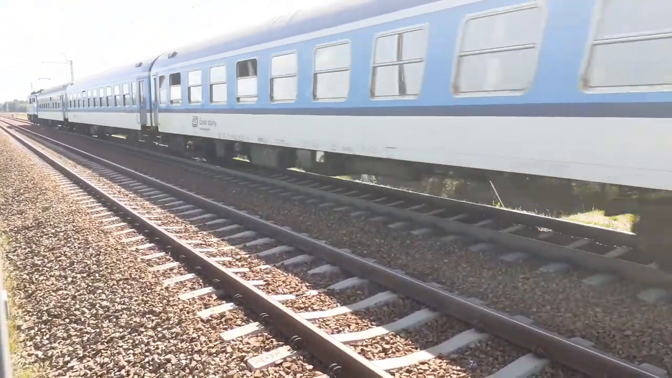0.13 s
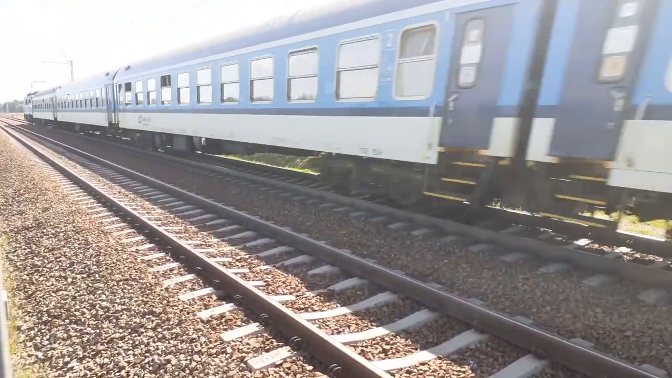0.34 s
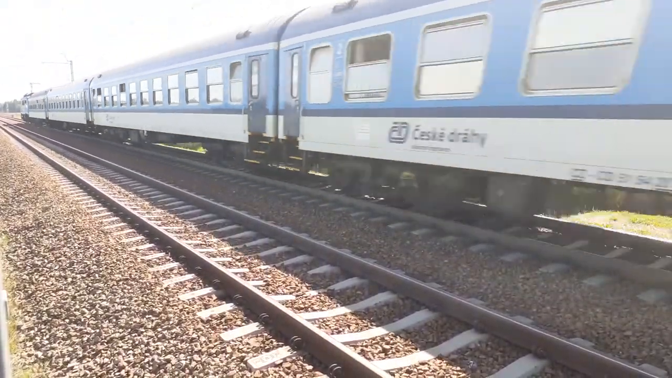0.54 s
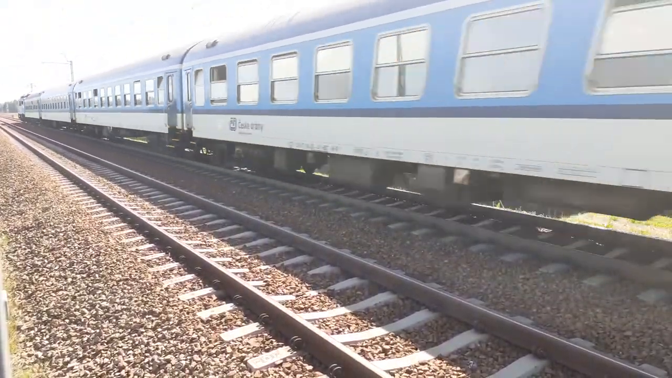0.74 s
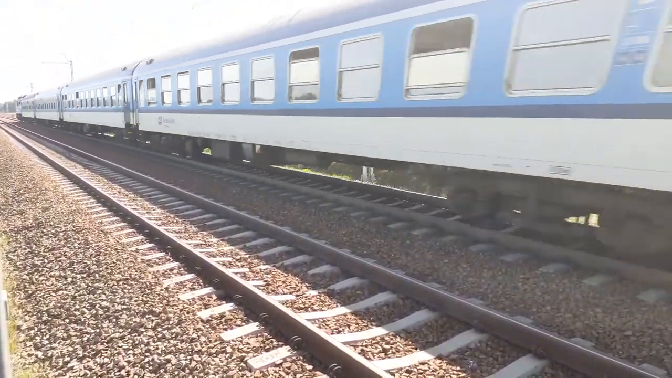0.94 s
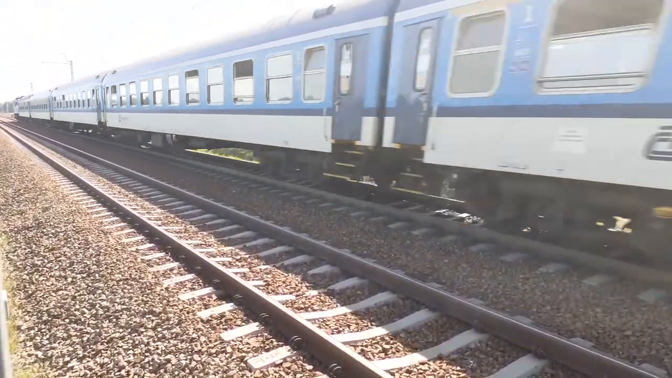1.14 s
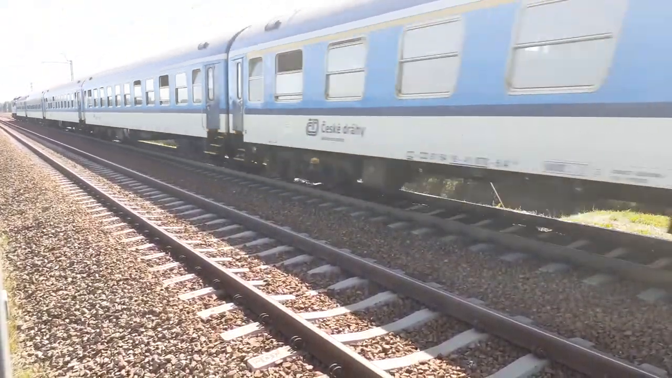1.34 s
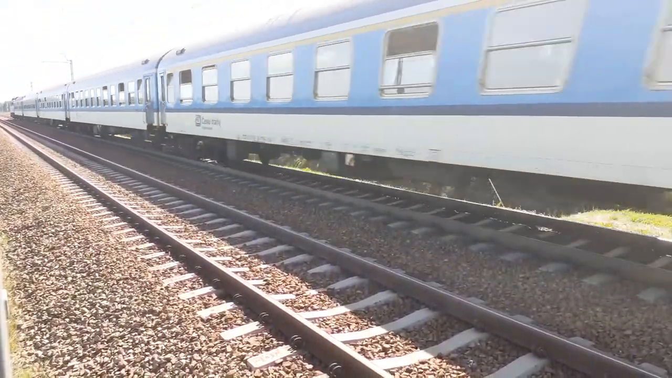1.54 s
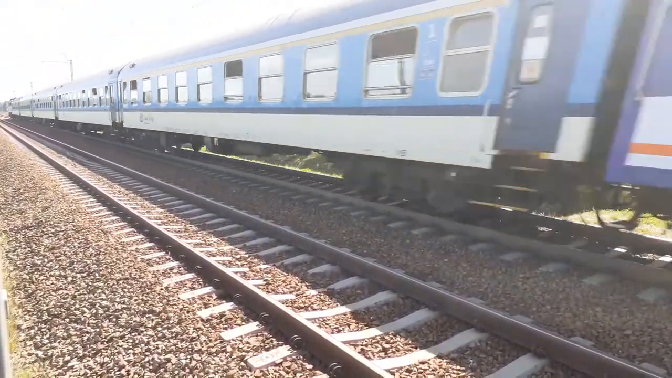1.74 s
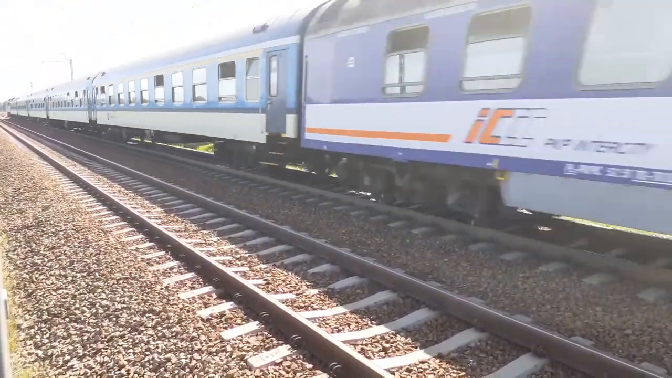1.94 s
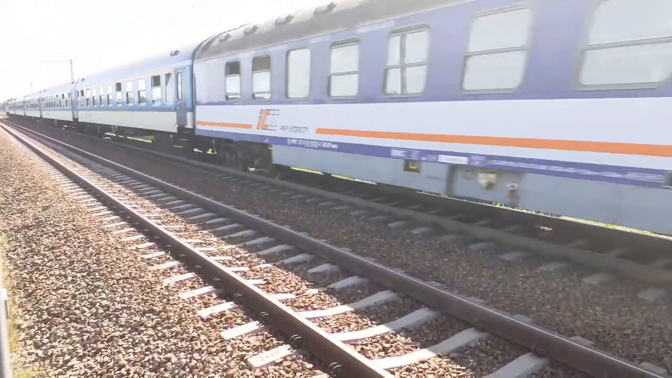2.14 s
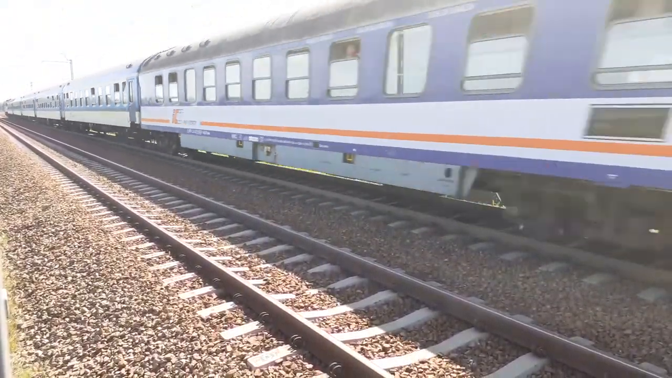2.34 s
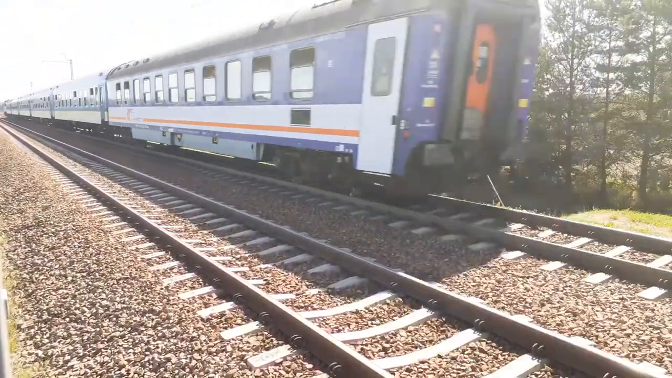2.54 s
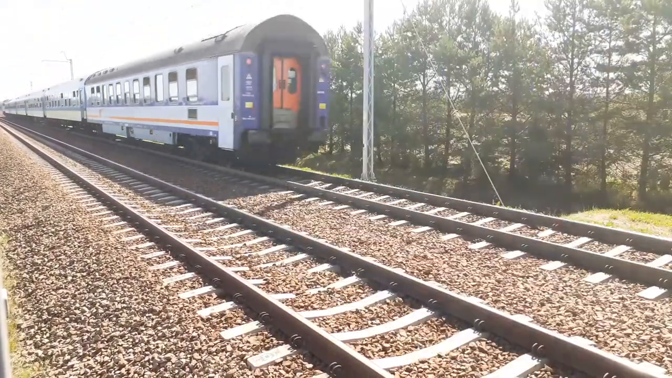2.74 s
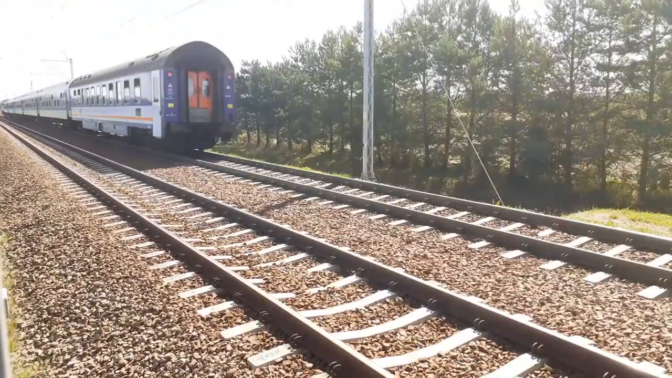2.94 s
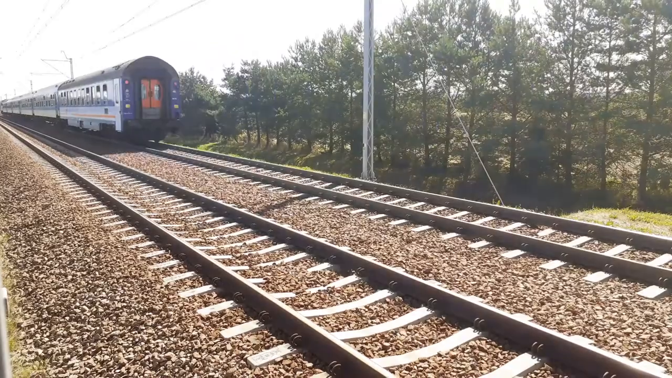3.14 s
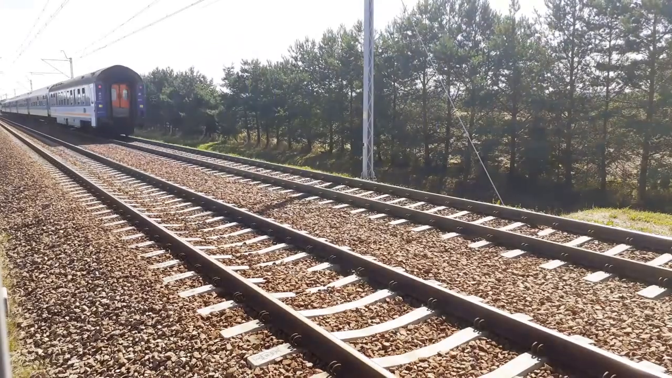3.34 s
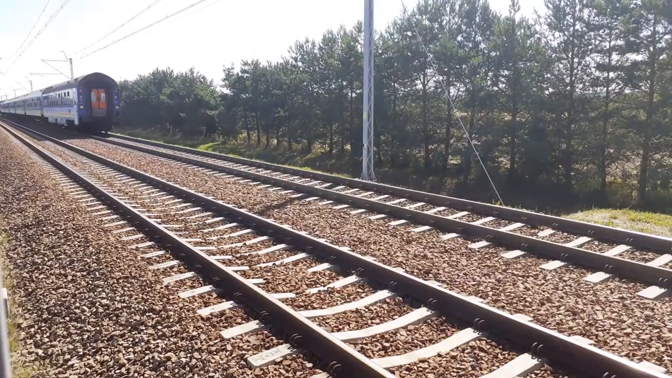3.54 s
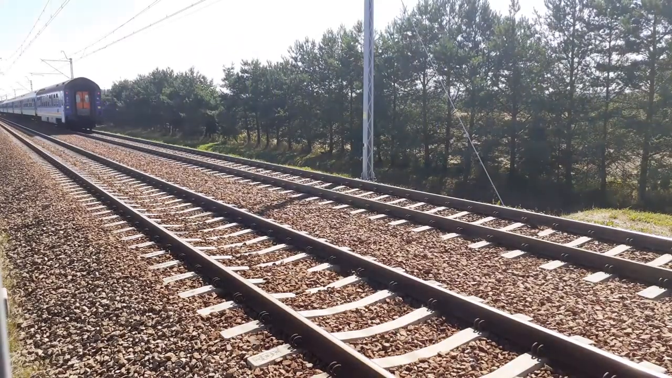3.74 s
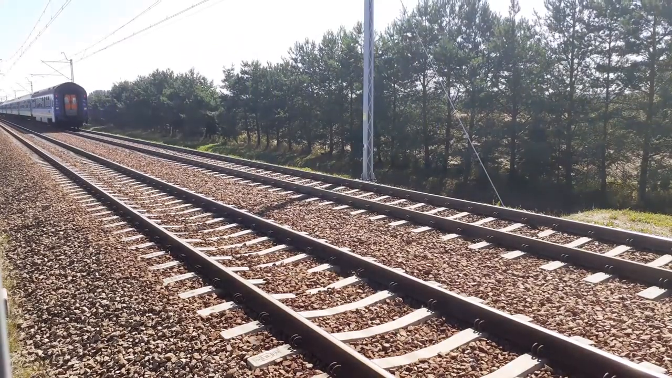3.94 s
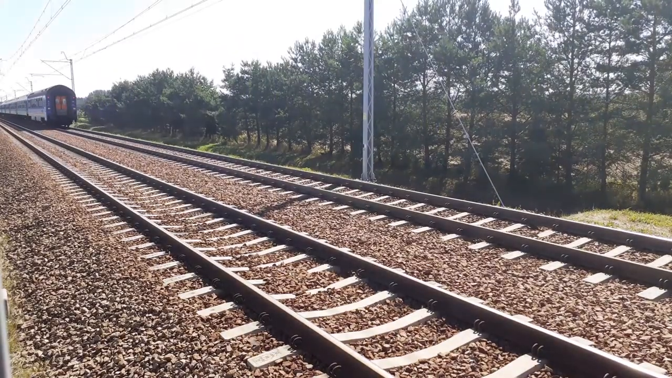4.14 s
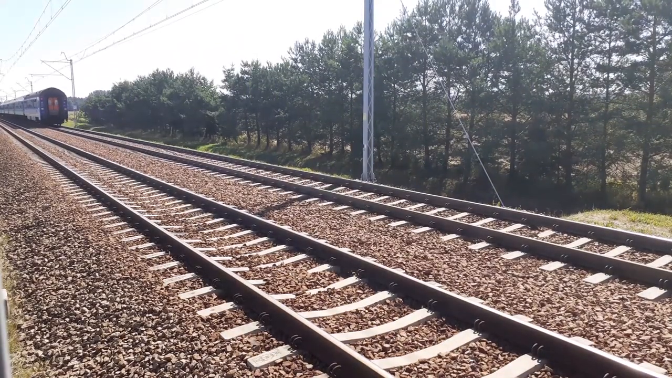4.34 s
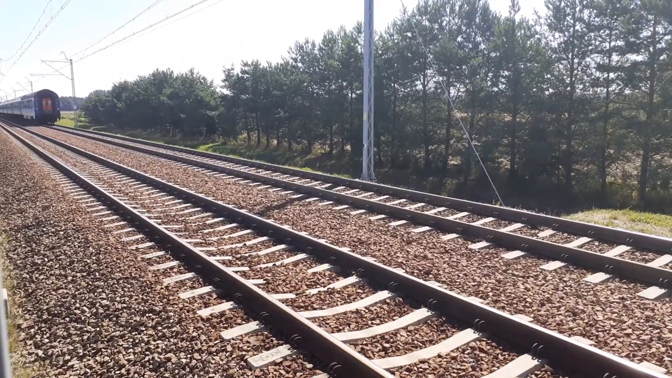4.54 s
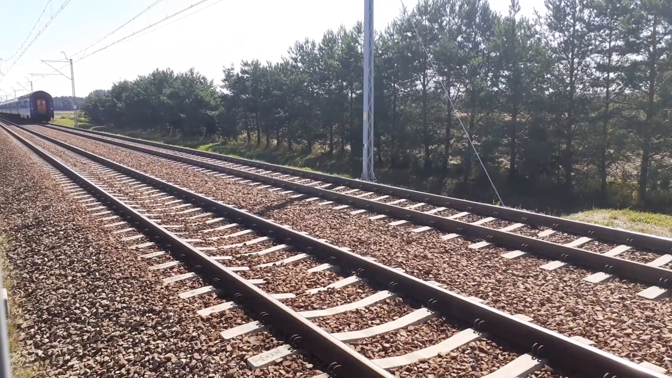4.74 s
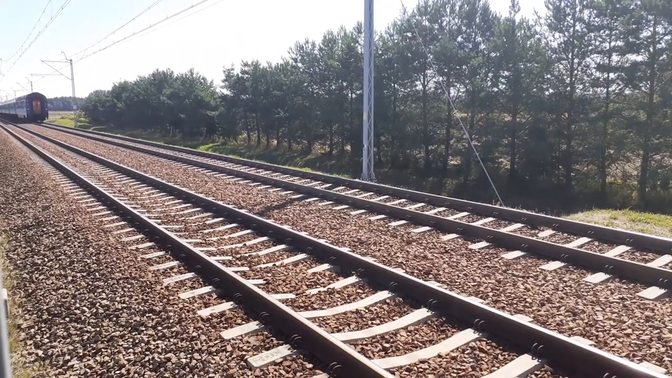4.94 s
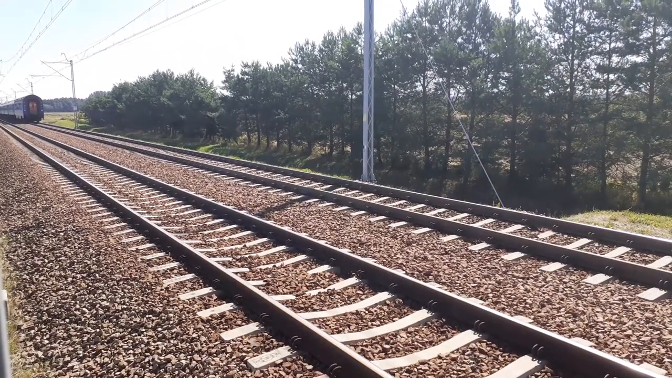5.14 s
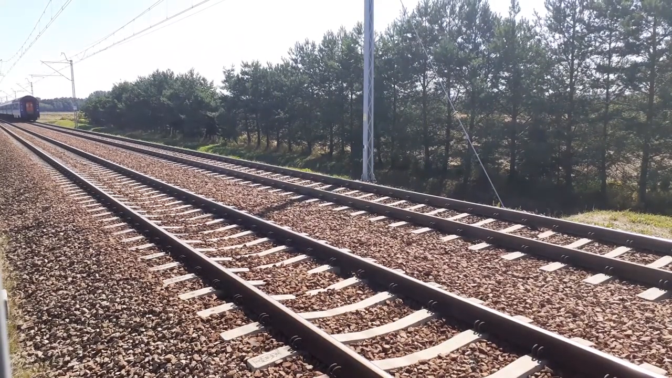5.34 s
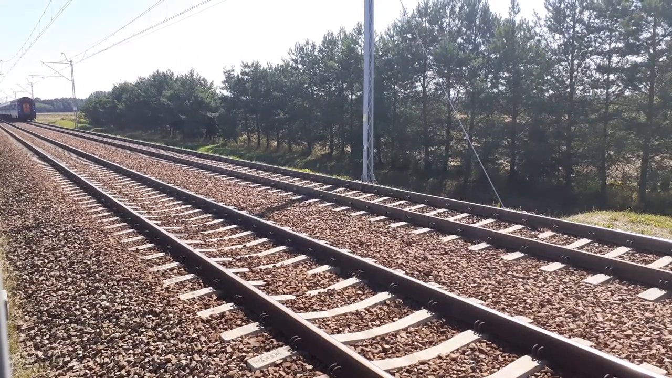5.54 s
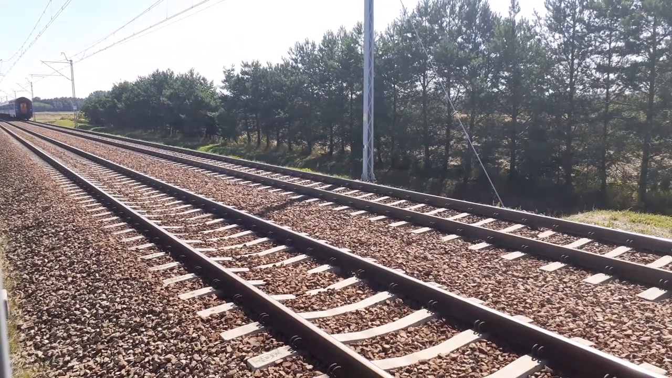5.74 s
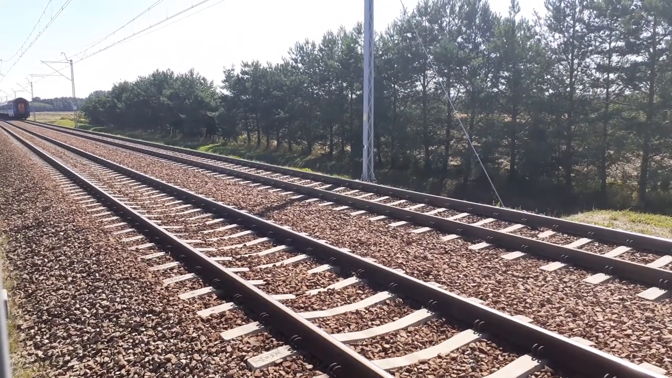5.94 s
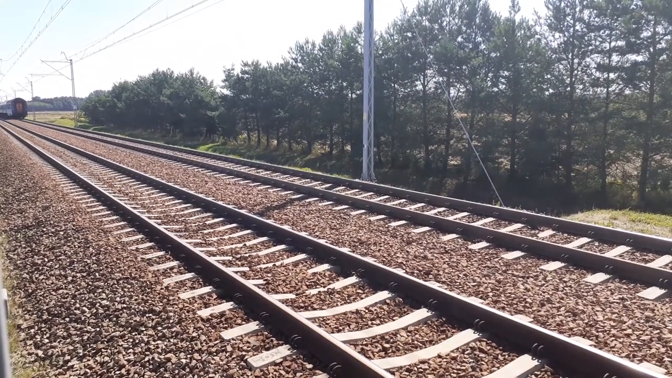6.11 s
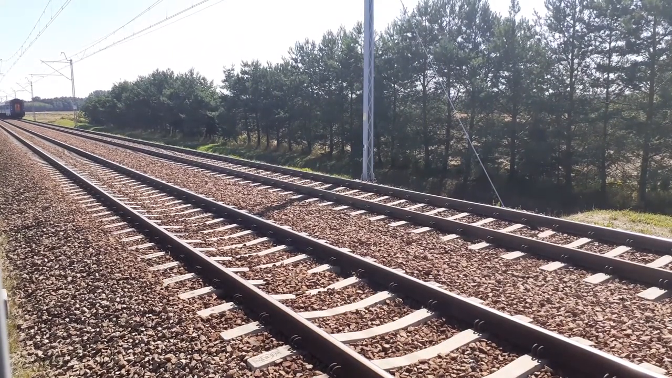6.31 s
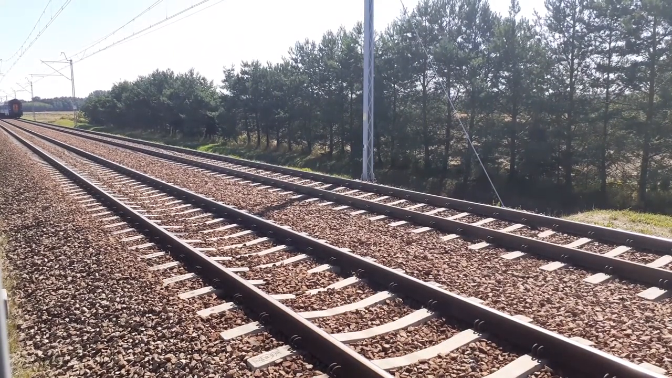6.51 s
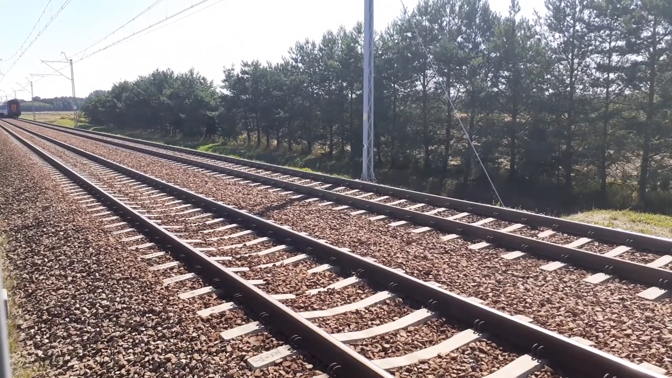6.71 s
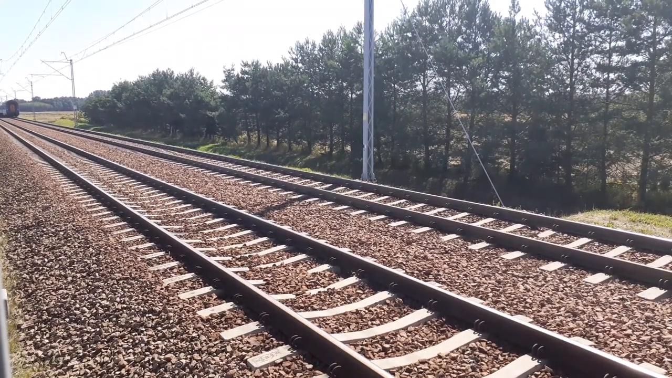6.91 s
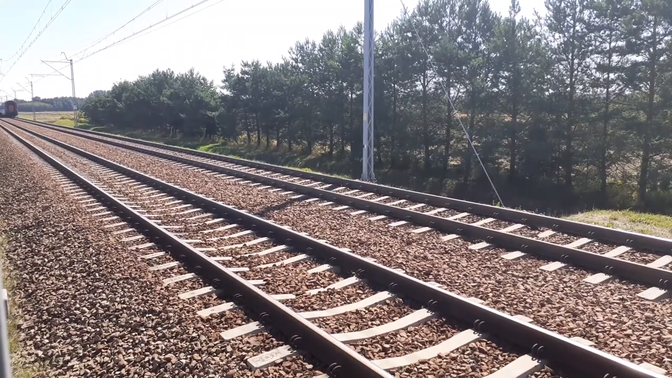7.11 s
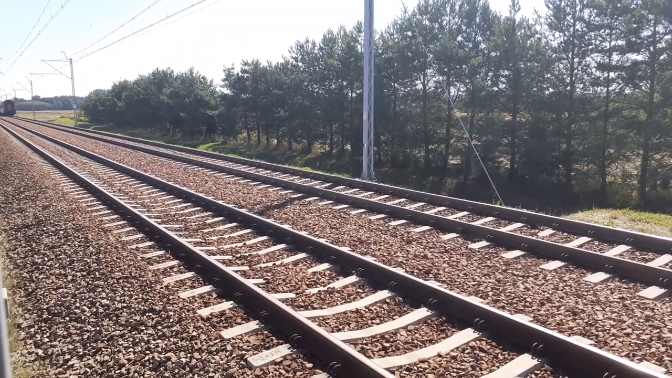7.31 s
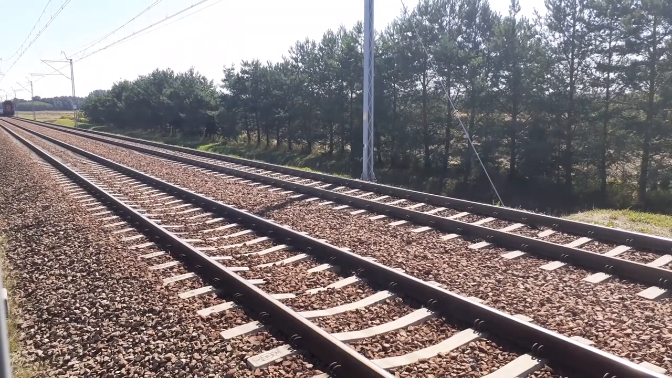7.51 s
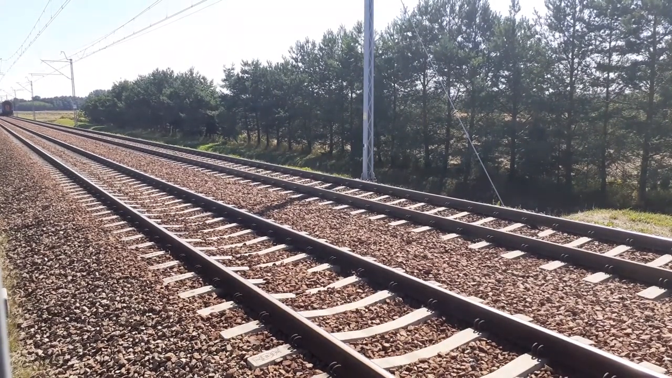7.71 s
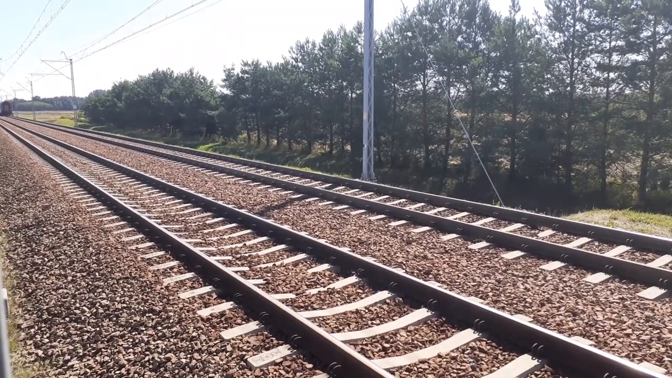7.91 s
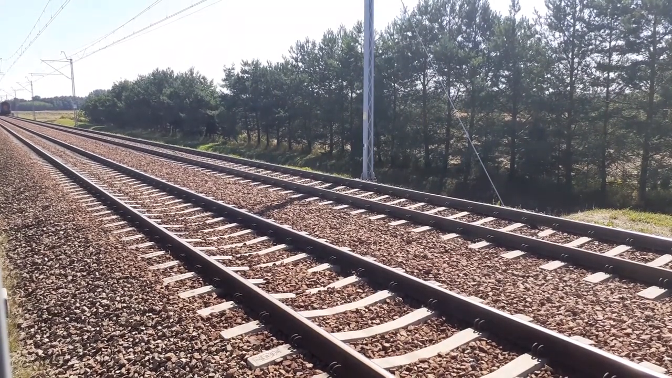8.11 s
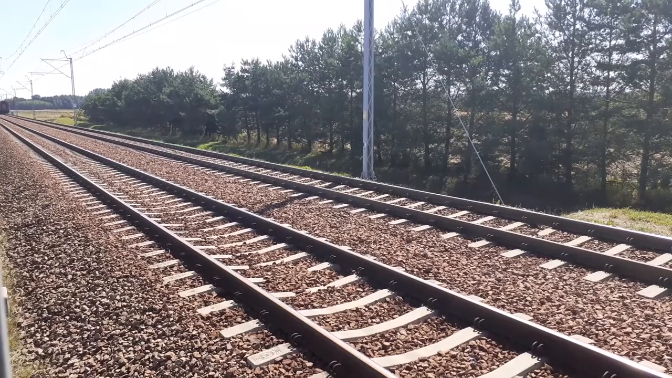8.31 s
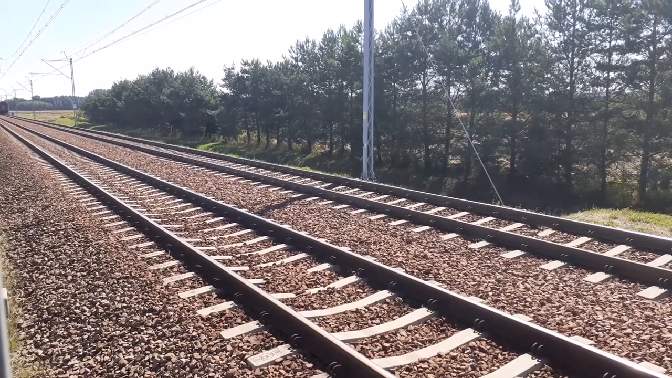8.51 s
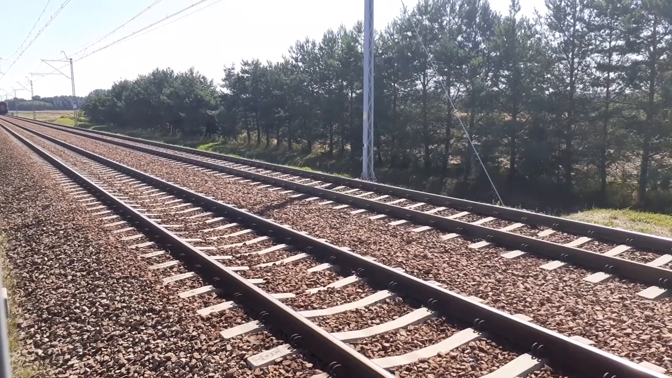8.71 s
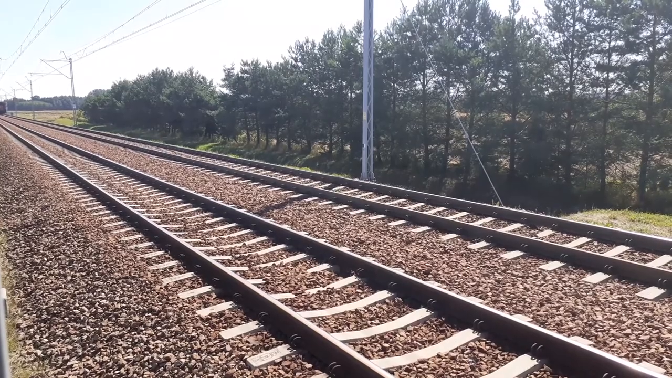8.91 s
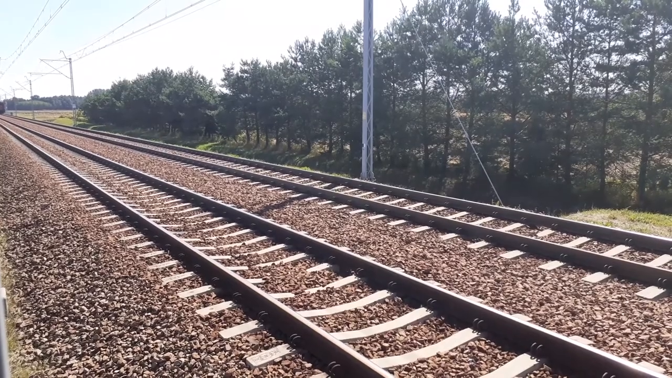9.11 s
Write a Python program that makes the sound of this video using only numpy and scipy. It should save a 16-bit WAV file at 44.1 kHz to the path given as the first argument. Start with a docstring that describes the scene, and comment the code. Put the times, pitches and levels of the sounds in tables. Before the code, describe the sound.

A loud rushing wheel-and-rail roar pulses by, drops away after about two seconds, leaving distant ringing rails and low gusty thumps on the microphone.

```python
"""The roar of an express's last coaches rushes past on the far track, then runs away down the line.
Rolling and ringing wheels are resonant noise; travel time and sweeps sink their pitch as they go by.
Sleepers drone, rails ring and contacts hiss as shaped noise; short tones flare up and decay in the roar.
Wake gusts are low noise and thumps at two microphone ports. Far off, narrow resonances waver
and two wheel modes sing as swelling tones."""
import sys
import numpy as np
from scipy import signal
from scipy.fft import rfft, irfft, next_fast_len
from scipy.io import wavfile

SR = 44100
rng = np.random.default_rng(int(sys.argv[2]) if len(sys.argv) > 2 else 0)


def transcribe(u):
    """Save the signal u as a 16-bit wav file named by the first command-line argument.

    u: samples, shape (n,) or (channels, n), limited to [-1, 1]; the rate is SR.
    q: integer samples, one column per channel.
    """
    v = np.clip(np.atleast_2d(u).T, -1, 1)
    q = np.round(v * 32767).astype(np.int16)
    wavfile.write(sys.argv[1], SR, q)


N = 403954
T = np.arange(N) / SR
HZ = np.maximum(np.fft.rfftfreq(2 * next_fast_len(N // 2 + 1, True), 1 / SR), 1)
SPEED_M_S, TRACK_M, SOUND_M_S = 32, 8, 343
# first coach end abreast, then spacing of the ends
FIRST_END_S, COACH_S = -0.4, 0.697
GONE_S = 2.32  # tail of the train clears the microphone
# mean rates: out-of-round wheels throb once a turn, sleepers pass much faster
TURN_HZ, SLEEPER_HZ = 11.7, 55.9


def undb(db):
    """Decibels to gain."""
    return np.exp(np.asarray(db) * (np.log(10) / 20))


def unit(x):
    """Scale to rms 1."""
    return x / np.sqrt(np.mean(x ** 2))


def curve(rows, column=1):
    """One column of a time table at every sample."""
    rows = np.array(rows)
    return np.interp(T, rows[:, 0], rows[:, column])


def over_hz(points):
    """Points joined on a log-frequency axis."""
    hz, value = np.transpose(points)
    return np.interp(np.log(HZ), np.log(hz), value)


def resonances(modes):
    """Joint gain of resonances (Hz, nominal width Hz, dB) with steep skirts."""
    power = 0
    for hz, width_hz, db in modes:
        offset = (HZ - hz) / (0.69 * width_hz)
        power = power + undb(db) ** 2 / (1 + offset ** 2) ** 2
    return np.sqrt(power)


def white():
    """Spectrum of a fresh white noise."""
    return rng.standard_normal(len(HZ)) + 1j * rng.standard_normal(len(HZ))


def walk(rate, t=T, order=4, size=32768):
    """Slow chance with spread 1; a lower order leaves more fine tremor."""
    steps = 16
    # drawn at a low rate, joined by straight lines
    lowpass = 1 + (steps * np.fft.rfftfreq(size)) ** order
    smooth = irfft(rfft(rng.standard_normal(size)) / lowpass)
    return np.interp(steps * rate * (t - t[0]), np.arange(size), unit(smooth))


def at_ports(gain, likeness, lag_ms=0):
    """Noise through a response, partly shared by both ports; the shared part reaches the left later."""
    c = np.clip(likeness, 0, 1)
    shared = np.sqrt(c) * white()
    late = np.exp(-2j * np.pi * HZ * lag_ms / 10 ** 3)
    ports = []
    for turn in (late, 1):
        own = np.sqrt(1 - c) * white()
        ports.append(irfft(gain * (shared * turn + own))[:N])
    return unit(np.array(ports))


def wavering(ports, drift_ms, rate):
    """Moving air varies the travel time, so that pitches wander."""
    arrival = T + drift_ms * walk(rate) / 10 ** 3
    return np.array([np.interp(arrival, T, port) for port in ports])


def throb(hz, depth_db, slip=0.0797):
    """Gain that beats at a rolling rate; the many wheels slip in and out of step."""
    phase = 2 * np.pi * np.cumsum(hz * (1 + slip * walk(3))) / SR
    return unit(undb(depth_db * np.abs(walk(2)) * np.sin(phase)))


def swell(centre_s, half_s):
    """Smooth hump of height 1, down to 1/e at half_s from the centre."""
    out = np.zeros(N)
    near = slice(*np.searchsorted(T, [centre_s - 4 * half_s, centre_s + 4 * half_s]))
    out[near] = np.exp(-((T[near] - centre_s) / half_s) ** 2)
    return out


def burst(age, rise_s):
    """Envelope that swells to 1 and dies away nearly as fast."""
    return (age / rise_s * np.exp(1 - age / rise_s)) ** 2


def strokes(rows, sound):
    """Place short sounds at their times and levels; sound(age, row) is what vibrates."""
    out, age = np.zeros((2, N + SR)), np.arange(SR // 5) / SR
    for row in rows:
        start = int(row[0] * SR)
        out[:, start:start + len(age)] += undb(row[1]) * sound(age, row)
    return out[:, :N]


def distance_to(k, lead_s=0):
    """Metres to bogie pair k."""
    return np.hypot(SPEED_M_S * (T + lead_s - FIRST_END_S - k * COACH_S), TRACK_M)


def passing(aim, lead_s=0):
    """Joint gain of the bogie pairs, each loudest when abreast; a higher aim is a narrower beam."""
    power = 0
    for k, db in enumerate(BOGIE_DB):
        power = power + (undb(db) * (TRACK_M / distance_to(k, lead_s)) ** aim) ** 2
    return np.sqrt(power)


def handover(fade_s):
    """Gains of the close and the far sound as the last coach goes by."""
    near = (1 - np.tanh((T - GONE_S) / (2 * fade_s))) / 2
    return np.sqrt(near), np.sqrt(1 - near)


# Bogie pairs at the coach ends, in order. Each entry: relative level in dB.
BOGIE_DB = [4, -1.5, 0.5, 1.5, -3]
# Wheel resonances at rest. Each row: frequency in Hz, nominal width in Hz, relative level in dB.
WHEEL_MODES = [(752, 72, 5), (790, 100, -13), (1650, 120, 5), (3300, 120, -34), (4190, 26, 0.5)]
# Rolling noise between the resonances. Each row: frequency in Hz, relative level in dB.
ROAR_TONE = [(30, -42), (62, -19.5), (120, -28), (200, -15), (260, -16), (320, -18), (450, -11), (620, 2.5),
             (1000, 4.5), (1750, 4.5), (2120, -2), (2700, -4.5), (3200, -26), (6000, -48)]


def bogies(port_ms=0.47, scatter_db=-8, turn_db=1.1, sleeper_db=2):
    """Each bogie pair roars; travel time bends the pitch and swings the sound across the ports."""
    response = np.hypot(resonances(WHEEL_MODES), undb(over_hz(ROAR_TONE)))
    roar = unit(irfft(white() * response))[:N]
    out, power = 0, 0
    for k, db in enumerate(BOGIE_DB):
        distance_m = distance_to(k)
        facing = TRACK_M / distance_m  # wheel discs radiate sideways
        # each pair rolls on its own stretch of roughness
        sent_s = (T - distance_m / SOUND_M_S + 2 * k + 2) % T[-1]
        gain = undb(db) * facing
        out = out + gain * np.interp([sent_s - facing * port_ms / 10 ** 3, sent_s], T, roar)
        power = power + gain ** 2
    ballast = at_ports(response, 0)  # scattered by the stones
    mixed = unit(out / np.sqrt(power) + undb(scatter_db) * ballast)
    return mixed * throb(TURN_HZ, turn_db) * throb(SLEEPER_HZ, sleeper_db)


# Fixed resonances of the track beside the coaches.
# Each row: frequency in Hz, nominal width in Hz, relative level in dB.
TRACK_MODES = [(675, 45, 1), (880, 55, 0), (1380, 90, -7), (1780, 130, -6), (2320, 70, -13),
               (4230, 120, -18)]


def coaches(near_db=-15.0, track_db=-7.0, surge_db=4.5, aim=1.0, fade_s=0.41):
    """Wheels and track swell with each coach end; low and high track resonances surge apart."""
    track = 0
    for modes in (TRACK_MODES[:2], TRACK_MODES[2:]):
        gain = resonances(modes)
        surge = unit(undb(surge_db * walk(30)))
        track = track + np.linalg.norm(gain) * at_ports(gain, 0.96, lag_ms=0.058) * surge
    close = unit(bogies() + undb(track_db) * unit(track))
    near, _ = handover(fade_s)
    return near * undb(near_db) * passing(aim) * close


# Sleepers shaken by the wheels. Each row: time in seconds, level in dB.
SLEEPER_LEVEL = [(0, -42.5), (1.5, -39), (2.1, -34.5), (2.45, -29.5), (2.9, -37), (4, -36.5), (5.2, -39),
                 (6.2, -45), (7.2, -47), (7.8, -58), (9.16, -57.5)]
# Colour of the sleepers. Each row: frequency in Hz, relative level in dB.
SLEEPER_COLOUR = [(120, -21), (300, -13), (345, 2), (415, 10), (450, 8), (490, 7.5), (530, 4), (700, -26.5)]
# Thin high rail ringing. Each row: frequency in Hz, nominal width in Hz, relative level in dB.
RAIL_RESONANCES = [(2150, 60, -4), (3070, 150, -6.5), (3250, 150, -7.5), (3800, 200, -2.5), (4190, 190, -7),
                   (4600, 190, -10), (5530, 220, -11.5), (6320, 260, -8.5), (6600, 260, -9.5),
                   (6910, 210, -6.5), (7060, 240, -13), (7300, 140, -15)]
# Rail ringing. Each row: time in seconds, level of the modes in dB before rail_db,
# level of a high whistle among them in dB.
RAIL_LEVEL = [(0, -50, -62), (3.3, -42, -57), (3.9, -41, -53), (4.5, -41, -49), (5.2, -42.5, -63),
              (6.45, -43.5, -55), (6.8, -44.5, -44), (7.2, -45.5, -50), (7.85, -47.5, -49),
              (8.4, -47.5, -55), (9.16, -50.5, -57)]


def track_ring(drone_hz=418, drone_db=7, rail_db=0.5, twinkle_db=1.9, drift_ms=0.399, groups=4):
    """Sleepers drone and the rails ring thinly, their modes wandering and swelling in turn."""
    drone = np.hypot(undb(over_hz(SLEEPER_COLOUR)), resonances([(drone_hz, 10, drone_db)]))
    sleepers = at_ports(drone, 0.94, lag_ms=0.12) * undb(curve(SLEEPER_LEVEL))
    rails = 0
    for k in range(groups):
        gain = resonances(RAIL_RESONANCES[k::groups])
        heard = wavering(at_ports(gain, 0.41, lag_ms=0.088), drift_ms, 3)
        rails = rails + np.linalg.norm(gain) * heard * undb(twinkle_db * walk(7))
    rails = unit(rails) * undb(curve(RAIL_LEVEL) + rail_db)
    whistle = at_ports(resonances([(7005, 130, 0)]), 0.6, lag_ms=0.14)
    whistle = wavering(whistle, 0.212, 4) * unit(undb(2.5 * walk(10)))
    return sleepers + rails + whistle * undb(curve(RAIL_LEVEL, column=2))


# far hiss: its slope changes at KNEE_S, then it sinks with distance
KNEE_S, SINK_DB_S = 4.4, 2


def hiss_level(near_db, far_db, rise_db_s, aim, lead_s=0.065, fade_s=0.23):
    """Hiss is beamed from each bogie pair just before it is abreast; from afar it bends down at a knee."""
    near, far = handover(fade_s)
    arch_db = np.minimum(rise_db_s * (T - KNEE_S), SINK_DB_S * (KNEE_S - T))
    return np.hypot(near * undb(near_db) * passing(aim, lead_s), far * undb(far_db + arch_db))


# Colour of the contact hiss. Each row: frequency in Hz, relative level in dB.
CONTACT_TONE = [(1500, -14), (2300, 3.5), (2750, -1.5), (3300, 2.5), (3850, 1.6), (4400, 1.3), (5000, -4.5),
                (5900, -9.5), (7000, -5), (7800, -12), (8800, -21.5), (11000, -23), (15500, -40)]
# Colour of its airy top. Each row: frequency in Hz, relative level in dB.
AIR_TONE = [(7000, -64), (9000, -9), (10300, 3), (11700, 8), (13300, 7), (15700, 0)]
# Likeness of the ports, for hiss and sound from down the line. Each row: frequency in Hz, likeness 0-1.
PORT_LIKENESS = [(300, 0.46), (650, 1), (1000, 0.55), (1350, 1), (1600, 0), (2300, 0.2), (3700, 0.17),
                 (5000, 0), (7000, 0.14), (12000, 0.3)]


def hiss(contact_flicker_db=1.3, air_flicker_db=0.5, drift_db=1.3):
    """Fine roughness hisses at the wheel contacts, with a thin airy top."""
    likeness = over_hz(PORT_LIKENESS)
    contact = at_ports(undb(over_hz(CONTACT_TONE)), likeness, lag_ms=0.066)
    contact = contact * undb(contact_flicker_db * walk(32))
    air = at_ports(undb(over_hz(AIR_TONE)), likeness, lag_ms=0.096)
    air = air * undb(air_flicker_db * walk(45) + drift_db * walk(6.7))
    return (contact * hiss_level(near_db=-25.5, far_db=-39.5, rise_db_s=-0.5, aim=0.75)
            + air * hiss_level(near_db=-43.5, far_db=-47.5, rise_db_s=3.0, aim=1.3))


# Single wheels ringing as they sweep by.
# Each row: height at in seconds, spread (sigma) in seconds, level in dB before surges, ring in Hz.
WHEEL_SWEEPS = [(0.099, 0.32, -17.5, 690), (0.151, 0.29, -22, 853), (0.155, 0.17, -26, 2590),
                (0.255, 0.49, -19.5, 1852), (0.519, 0.16, -26.5, 2287), (0.618, 0.18, -24, 1435),
                (.62, 0.3, -23, 879), (0.677, 0.084, -18, 1933), (0.649, 0.16, -25, 2600),
                (0.902, 0.099, -36, 4300), (0.981, .16, -24, 1376), (0.981, 0.26, -17.5, 1795),
                (1.2, 0.057, -16, 1690), (1.08, 0.13, -21.5, 833), (1.42, 0.11, -15.5, 1864),
                (1.46, 0.32, -36, 2490), (1.551, 0.13, -43, 4050), (1.765, 0.18, -20.5, 1693),
                (1.843, 0.068, -19.5, 693), (1.874, 0.14, -17, 1314), (1.847, 0.086, -33, 2304),
                (2.032, .07, -24.5, 2300), (2.16, 0.026, -23, 2200), (2.248, 0.11, -22, 704),
                (2.258, 0.22, -33, 3650), (2.332, 0.18, -26.5, 1396), (2.444, 0.085, -37, 2810)]


def wheel_rings(sweep=0.031, sweep_s=0.3, width_share=0.042, surge_db=1.0, port_ms=0.42, scatter=0.81):
    """Rough tread shakes a wheel mode; it swells as the wheel comes abreast and its pitch falls."""
    out = np.zeros((2, N))
    for when_s, spread_s, level_db, hz in WHEEL_SWEEPS:
        near = np.abs(T - when_s) < 0.6
        age = T[near] - when_s

        def tremor():
            return walk(width_share * hz, age, order=2, size=8192)

        def shaken():
            return tremor() + 1j * tremor()

        phase = 2 * np.pi * np.cumsum(hz * (1 - sweep * np.tanh(age / sweep_s))) / SR
        direct = shaken() * np.exp(-2j * np.pi * hz * np.array([[port_ms], [0]]) / 10 ** 3)
        scattered = scatter * np.array([shaken(), shaken()])
        ring = ((direct + scattered) * np.exp(1j * phase)).real
        ring = unit(ring * undb(surge_db * walk(25.8, age, size=1024)))
        out[:, near] += ring * undb(level_db) * np.exp(-(age / spread_s) ** 2 / 2)
    return out


# Short bursts of tone within the roar.
# Each row: start in seconds, level of the main tone in dB, tone in Hz, rise in seconds.
TONE_BURSTS = [(.2405, -4, 1840, 0.0026), (.253, -10, 1840, 0.0035), (.286, -12.5, 1890, 0.0059),
               (.339, -10, 1750, .005), (.352, -9.5, 1770, .004), (.417, -10, 850, 0.0069),
               (.585, -16, 1870, 0.0064), (.9, -15, 1955, 0.0079), (1.019, -15, 1755, 0.0072),
               (1.419, -8, 1910, 0.0055), (1.468, -8, 1784, .006), (1.675, -12, 1735, 0.009),
               (1.773, -9, 716, .008), (1.86, -13, 693, 0.0049), (1.883, -14, 690, 0.0066),
               (1.955, -14, 1290, .007), (2.207, -9.5, 725, 0.0078), (2.38, -15, 1414, .007),
               (2.455, -13, 1295, .007), (4.7315, -15.5, 794, 0.0019), (4.7865, -19, 890, .003)]


def tone_bursts(neighbour_db=-13, count=3):
    """A short tone swells and dies away, beating with weaker neighbouring tones."""
    def tone(age, row):
        lead = np.array([[-0.6], [0]])  # radians, left and right
        cluster_hz = row[2] + rng.uniform(-99, 90, (count, 1, 1))
        cycles = cluster_hz * age + rng.random((count, 1, 1))
        neighbours = np.sin(2 * np.pi * cycles + lead).sum(axis=0)
        main = np.sin(2 * np.pi * row[2] * age + lead)
        return burst(age, row[3]) * (main + undb(neighbour_db) * neighbours)
    return strokes(TONE_BURSTS, tone)


# Colour of the wind on the ports. Each row: frequency in Hz, relative level in dB.
WIND_COLOUR = [(20, -24), (40, -13), (62, 3), (120, 0.5), (200, -3), (300, -7.5), (500, -13), (1200, -69.5),
               (4000, -70)]
# Single buffets. Each row: start in seconds, peak in dB before the leak, thump in Hz, port likeness 0-1.
BUFFET_STROKES = [(1.235, -23, 193, 0.9), (2.32, -35, 201, 0.6), (2.425, -32, 170, .7),
                  (3.24, -32, 132, 0.44), (3.345, -35, 110, .6), (4.219, -25, 142.5, .5),
                  (4.262, -35, 150, .5), (4.363, -28, 140, .5), (4.781, -22.5, 191, 0.1),
                  (4.97, -29, 130, .5), (5.548, -26, 140, .5), (5.635, -22, 129, 0.3),
                  (5.667, -20, 272, 0.3), (5.78, -22, 100, .6), (5.832, -26, 220, .4), (5.98, -27, 110, .5),
                  (6.104, -32, 120, .5), (6.446, -27, 110, .6), (6.616, -24, 150, 0.4),
                  (6.739, -21, 121, 0.6), (6.757, -24, 110, .6), (6.83, -21, 111, .5),
                  (6.982, -24.5, 160, 0.4), (7.046, -28, 120, .5), (7.188, -28, 140, .5),
                  (7.293, -17.5, 152, 0.6), (7.317, -19, 150, 0.6), (7.358, -21, 170, .6),
                  (7.376, -18, 210, 0.5), (7.503, -26, 230, .4), (7.531, -24, 200, 0.4),
                  (7.582, -22, 170, 0.6), (7.669, -18.5, 130, 0.2), (7.691, -17, 230, .3),
                  (7.736, -19, 160, 0.3), (7.824, -23, 129, .6), (7.902, -20, 138, .7),
                  (8.004, -27, 120, 0.5), (8.341, -21, 142.6, 0.3), (8.379, -9.5, 136, 0.5),
                  (8.434, -19, 117, .8), (8.524, -29, 130, .6)]
# Breeze of the wake, building behind the train. Each row: time in seconds, level in dB.
BREEZE_LEVEL = [(3.0, -68), (3.7, -54), (4.2, -43), (5.6, -38), (6.4, -45.5), (7.5, -38.5), (8.3, -44.5),
                (8.85, -53.5)]
# Gusts within it. Each row: height at in seconds, half length in seconds, level in dB.
GUST_SWELLS = [(3.28, 0.12, -47), (3.81, 0.054, -43), (4.233, 0.11, -44), (5.477, 0.14, -39),
               (5.802, 0.28, -40.5), (6.744, 0.13, -36), (7.05, .12, -46), (7.353, 0.11, -33),
               (7.533, 0.037, -22.5), (7.7, 0.058, -28.5), (7.843, 0.1, -34), (8.414, 0.04, -34),
               (8.5, 0.09, -39.5), (9.05, 0.071, -50)]


def wake(eddy_db=4, rise_s=0.0032, leak_hz=50):
    """Eddies hit each port almost on its own; single buffets are short thumps."""
    def thump(age, row):
        apart = np.arccos(np.clip(row[3], 0, 1)) * np.array([[0.5], [-0.5]])
        return burst(age, rise_s) * np.sin(2 * np.pi * (row[2] * age + rng.random()) + apart)
    gust_gain = sum(undb(db) * swell(when_s, half_s) for when_s, half_s, db in GUST_SWELLS)
    flow = np.hypot(undb(curve(BREEZE_LEVEL)), gust_gain)
    eddies = np.array([unit(undb(eddy_db * walk(28))) for _ in range(2)])
    gusts = at_ports(undb(over_hz(WIND_COLOUR)), 0.057) * eddies * flow
    # slow pressure leaks past the membrane
    leak = signal.butter(2, leak_hz, "high", fs=SR, output="sos")
    return gusts + signal.sosfilt(leak, strokes(BUFFET_STROKES, thump))


# Rails and wheels ringing from down the line.
# Each row: frequency in Hz, nominal width in Hz, relative level in dB at first, the same farther off.
DISTANT_MODES = [(618, 25, 2.5, -3), (665, 44, -2, -2), (780, 56, -7.5, -4), (825, 39, 1, 3),
                 (896, 14.5, 3, 4), (925.5, 18, 3, 2.5), (1000, 21, 1.5, 0.5), (1032, 11.6, 4.5, -2),
                 (1102, 21, -4.5, -0.5), (1130, 38, -5, 1.5), (1194, 30, -6.5, -0.5), (1260, 33, -1.5, -1),
                 (1310, 30, -9.5, 1.5), (1366, 43, -1.5, 0.5), (1490, 54, -5, -19), (1590, 52, -8.5, -9),
                 (1653, 44, -4.5, -4), (1747, 106, -9.5, -25), (2288, 80, -15.5, -14.5)]
# Broad roar from down the line. Each row: frequency in Hz, relative level in dB.
DISTANT_ROAR = [(250, -36), (530, -9.5), (620, -2), (900, 0), (1350, -5), (1450, -7.5), (1750, -8.5),
                (2050, -19), (2600, -65), (4000, -71)]
# Rolling noise from down the line. Each row: time in seconds, level in dB before handover and surges.
DISTANT_LEVEL = [(2.0, -17), (3.0, -25), (3.6, -22.5), (4.1, -21.5), (4.8, -22.5), (5.3, -23), (6.2, -24),
                 (6.95, -24), (7.5, -26.5), (8.2, -27), (9.16, -30.5)]


def down_the_line(roar_db=-2, dulling_db_s=-0.24, twinkle_db=2, drift_ms=0.32,
                  change_s=5.47, over_s=0.75, turn_db=1.4, fade_s=0.41):
    """Ringing outlasts the roar; moving air wavers it, and other modes take over farther off."""
    likeness = over_hz(PORT_LIKENESS)
    late = (1 + np.tanh((T - change_s) / over_s)) / 2
    ring = 0
    for column, share in ((2, 1 - late), (3, late)):
        for k in range(2):
            gain = resonances([(row[0], row[1], row[column]) for row in DISTANT_MODES[k::2]])
            heard = wavering(at_ports(gain, likeness, lag_ms=0.14), drift_ms, 2)
            twinkle = undb(twinkle_db * walk(10.7))
            ring = ring + np.linalg.norm(gain) * heard * np.sqrt(share) * twinkle
    roar = at_ports(undb(over_hz(DISTANT_ROAR)), likeness, lag_ms=0.044)
    roar_share = undb(roar_db + dulling_db_s * (T + 3.5))
    mixed = (unit(ring) + roar_share * roar) / np.hypot(1, roar_share)
    _, far = handover(fade_s)
    return far * undb(curve(DISTANT_LEVEL)) * mixed * throb(TURN_HZ, turn_db)


# Steady singing of the upper wheel mode. Each row: time in seconds, level in dB before surges.
SING_LEVEL = [(2, -65), (3, -39), (3.35, -32), (4.6, -39), (5.1, -31), (5.5, -40), (5.9, -33.5), (7, -31.5),
              (7.45, -33), (8.3, -34), (9.16, -36.5)]
# Mean pitches of the modes. Each entry: frequency in Hz, lower then upper.
SING_PITCH_HZ = [1209, 1348]
# Swells of the modes. Each row: height at in seconds, half length in seconds,
# rms level in dB before surges, mode 0 lower or 1 upper.
MODE_SWELLS = [(3.15, 0.034, -33, 0), (3.42, .05, -35, 0), (3.56, .07, -31, 0), (3.73, .05, -30, 0),
               (3.893, 0.027, -28, 0), (4.003, .045, -24.5, 0), (4.153, .075, -26.5, 0),
               (4.171, 0.031, -28.5, 1), (4.316, 0.038, -28.5, 0), (4.488, .045, -26, 0),
               (4.585, 0.049, -25, 0), (4.778, 0.033, -24, 1), (4.96, 0.028, -24, 1),
               (4.968, 0.099, -31, 0), (5.297, .06, -31, 0), (5.825, .04, -29, 1), (6.15, .07, -31, 0),
               (6.634, 0.042, -31, 1), (6.9, 0.044, -28, 1), (7.166, .04, -29.5, 1), (7.212, .08, -35, 0),
               (7.692, .035, -27.5, 1), (7.873, 0.03, -27.5, 1), (8.223, 0.023, -25.5, 1),
               (8.723, 0.02, -27.5, 1)]


def singing_wheels(wander_hz=3):
    """Two lightly damped wheel modes swell into almost pure tones; the upper throbs on between swells."""
    tones = 0
    for k, hz in enumerate(SING_PITCH_HZ):
        phase = 2 * np.pi * np.cumsum(hz + wander_hz * walk(30)) / SR
        level = 0
        for when_s, half_s, db, mode in MODE_SWELLS:
            if round(mode) == k:
                level = level + undb(db) * swell(when_s, half_s)
        tones = tones + np.sqrt(2) * np.sin(phase + np.array([[0.7], [0]])) * level
    upper = at_ports(resonances([(SING_PITCH_HZ[1], 29, 0)]), 0.9, lag_ms=0.13)
    return tones + upper * throb(TURN_HZ, 3) * undb(curve(SING_LEVEL))


# Brief swells and dips of the rolling noise and wheel tones.
# Each row: centre in seconds, half length in seconds, change in dB.
ROLLING_SURGES = [(0.233, 0.032, -2.5), (0.404, 0.049, -3), (.55, 0.049, 1), (0.867, .025, -1),
                  (1.304, 0.017, -1.5), (1.625, 0.022, -0.5), (1.993, 0.016, -3), (2.16, 0.024, -0.5),
                  (2.38, 0.02, 0), (2.58, 0.016, -1), (3.636, 0.057, -2.5), (4.718, .01, -2),
                  (4.775, 0.025, 1), (5.516, 0.081, -3), (6, 0.015, -4), (6.03, 0.019, 5.5),
                  (7.378, 0.017, -3), (7.764, 0.044, -3), (7.893, 0.041, 0), (8.206, 0.029, -0.5),
                  (8.48, 0.038, -2.5), (8.74, 0.061, 1.5), (8.88, 0.075, -2), (9.022, 0.015, 4)]


def scene():
    """Train, track and wind together; the roar and the wheel tones surge as one."""
    surges = undb(sum(db * swell(when_s, half_s) for when_s, half_s, db in ROLLING_SURGES))
    train = surges * (coaches() + wheel_rings() + down_the_line() + singing_wheels())
    return train + track_ring() + hiss() + tone_bursts() + wake()


# The casing shades the ports. Each row: frequency in Hz, left minus right in dB.
CASING_SHADE = [(120, -1.5), (260, 0), (420, 3), (560, 0), (660, .5), (740, 4), (830, 1), (940, 3.5),
                (1060, -3), (1280, 2), (1600, 0), (3500, -.7), (5500, .2)]
TOP_HZ = 15600


def record(dry):
    """The casing colours each port, peaks stop at full scale and the top is cut."""
    shade = undb(over_hz(CASING_SHADE) * np.array([[0.5], [-0.5]]))
    ports = irfft(rfft(dry, 2 * (len(HZ) - 1)) * shade)[:, :N]
    top_cut = signal.ellip(10, 0.1, 80, TOP_HZ, fs=SR, output="sos")
    return signal.sosfilt(top_cut, np.clip(ports, -1, 1))


dry = scene()
out = record(dry)
transcribe(out)
```